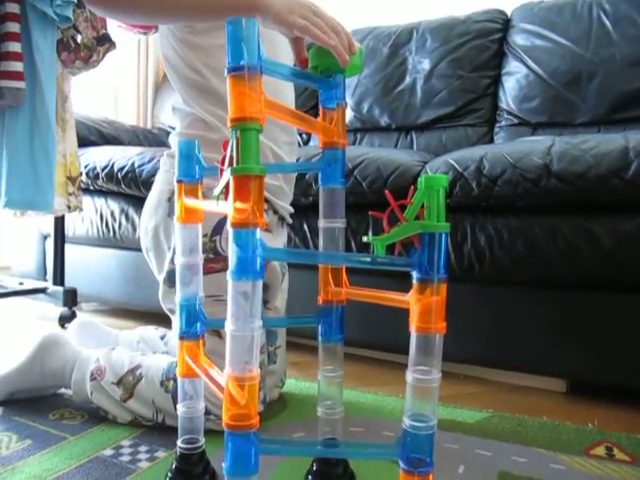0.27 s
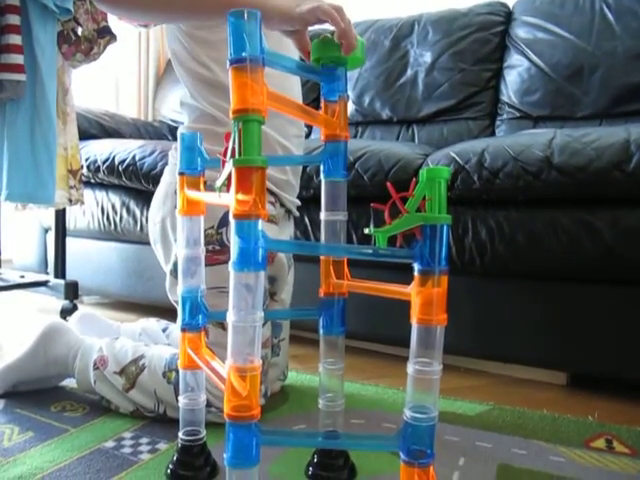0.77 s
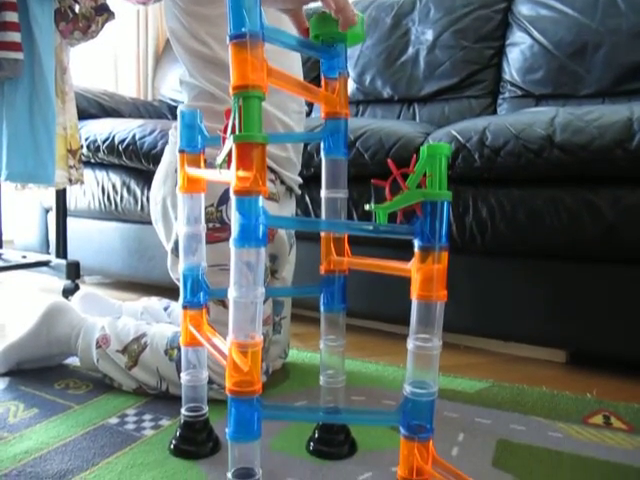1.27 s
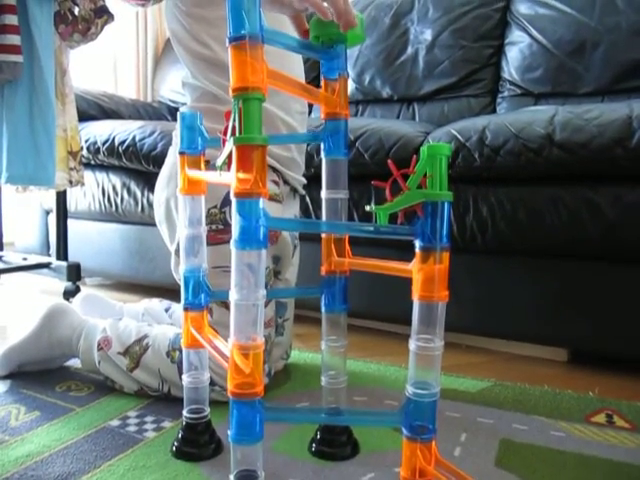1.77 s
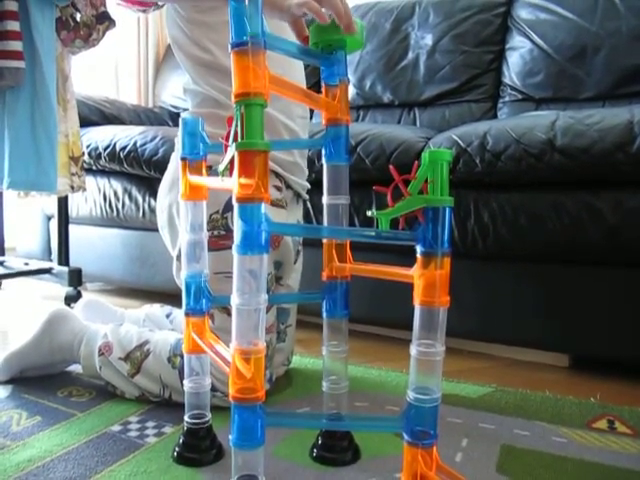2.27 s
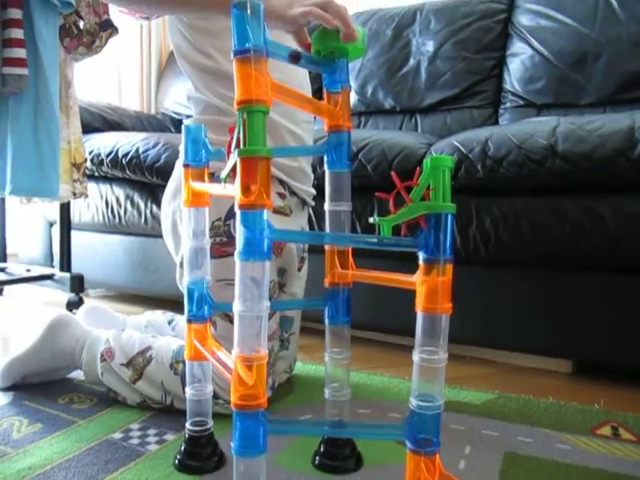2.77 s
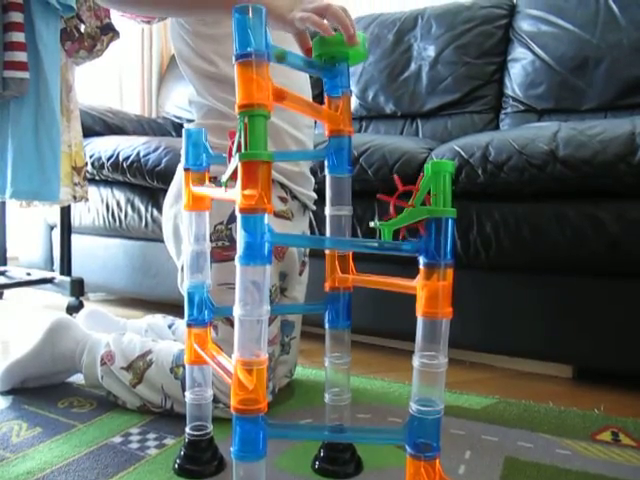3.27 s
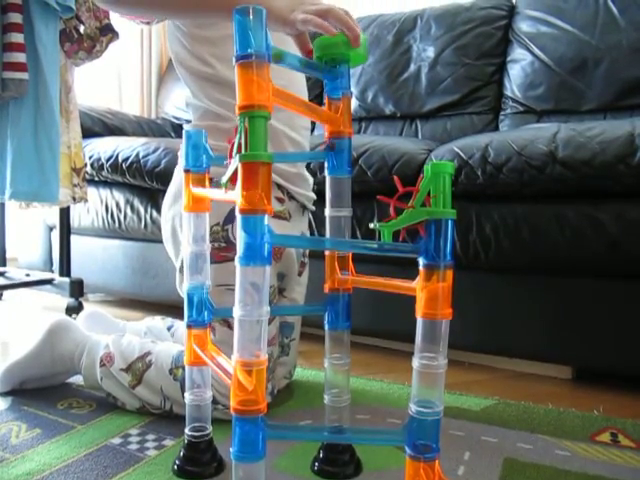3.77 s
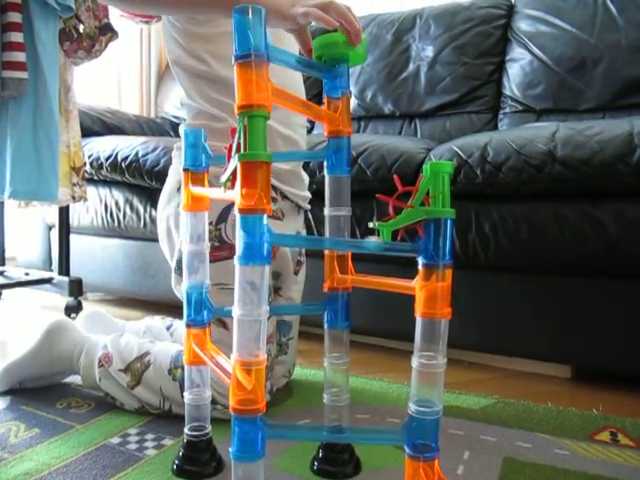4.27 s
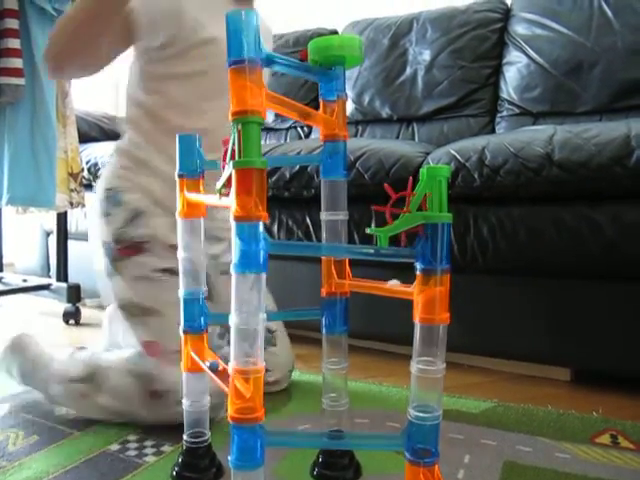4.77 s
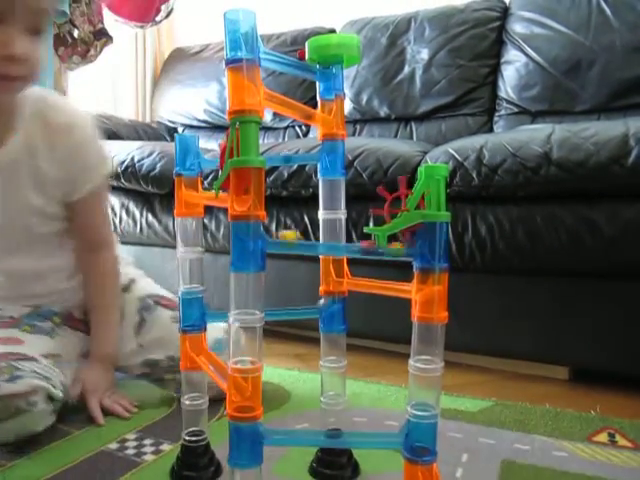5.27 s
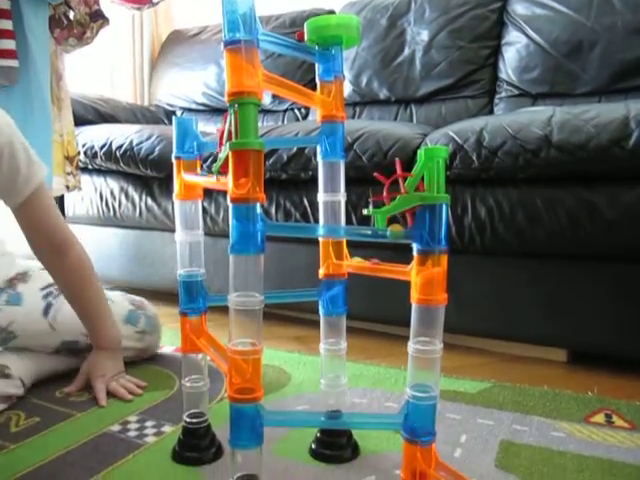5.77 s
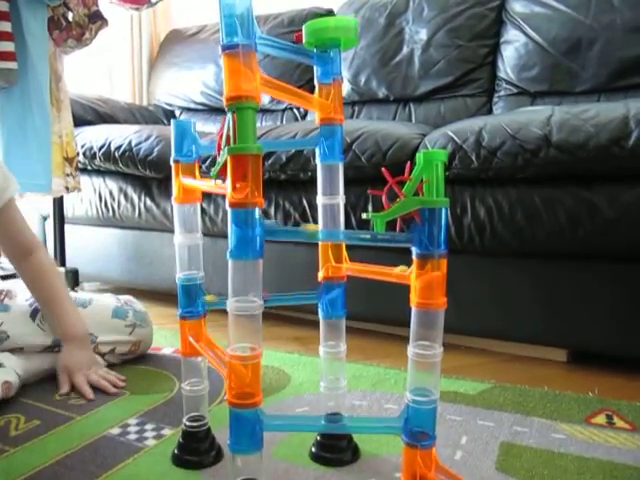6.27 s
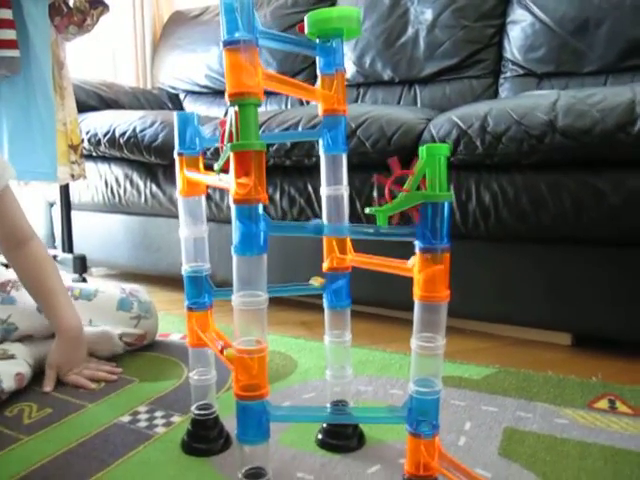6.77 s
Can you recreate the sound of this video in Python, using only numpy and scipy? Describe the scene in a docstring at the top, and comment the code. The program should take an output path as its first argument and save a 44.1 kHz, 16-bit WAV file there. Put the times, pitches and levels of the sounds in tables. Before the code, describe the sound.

For the first 0.65 seconds there is only soft room noise, hiss and a barely audible high whine. A glass marble then taps lightly on plastic at about 0.7 s, followed by a louder, crisp cluster from 1.2 to 1.4 s. Further bursts come around 1.65-1.9 s and 2.3-2.4 s, with lulls of faint ticking between them. From 2.8 s the clusters are stronger and closer, near 3.0, 3.4 and 3.7-4.0 s, with a brief easing just after 4. From about 4.3 s several marbles run together: hard, irregular clicks overlap a swelling, grainy rolling rattle, loudest from about 5 s and continuing to the cut at about 7 s. Each knock is short and bright with a tiny hollow plastic ring; occasional rim hits ping piercingly. The close microphone slightly overloads on the hardest knocks, and a living room adds short echoes.

```python
"""Glass marbles are dropped one after another into a plastic marble run in a living room.
Each knock is a short tick, a brief note of the struck wall and the ring of the piece of track.
Rolling is a stream of random small bumps that grows as more marbles run; stiff rims ping very high.
The room answers with fading echoes. A near camera adds filtered noise as hiss and a faint steady whine."""
import sys
import numpy as np
from scipy import signal
from scipy.io import wavfile

SR = 44100
rng = np.random.default_rng(int(sys.argv[2]) if len(sys.argv) > 2 else 0)


def waveform_to_disk(signal):
    """Save audio, clipped to [-1, 1], as 16-bit WAV at the path in sys.argv[1]."""
    frames = np.transpose(np.atleast_2d(signal))
    scaled = np.clip(frames, -1, 1) * 32767
    samples = np.round(scaled).astype(np.int16)
    wavfile.write(sys.argv[1], SR, samples)


N = 310023  # length of the scene [samples]

# clear knocks of a marble on plastic: (time [s], level before the parts' own levels [dB], wall pitch [Hz])
KNOCK_LIST = [(0.6734, -53, 3180), (0.7365, -20, 3000), (0.797, -26, 2440), (0.8598, -26.5, 2170),
              (1.1155, -30, 1940), (1.1702, -31, 2750.0), (1.1992, -14.5, 2250), (1.2173, -11.5, 3250),
              (1.2707, -22, 2470.0), (1.3122, -12.5, 3500), (1.375, -16.5, 2390), (1.4236, -38, 2150),
              (1.636, -12.5, 2620), (1.709, -19, 3700), (1.7662, -10.5, 2330), (1.7868, -10.5, 3200),
              (1.8174, -15.5, 3160), (1.8526, -15.5, 3110.0), (1.9184, -19, 2380), (2.0932, -38, 2810.0),
              (2.119, -35, 2290.0), (2.2605, -27.5, 2560), (2.2731, -9.5, 3930), (2.3068, -12.5, 2460),
              (2.3282, -10, 2840.0), (2.3408, -8.5, 3750), (2.3859, -10.5, 3310.0), (2.5038, -22, 2590),
              (2.5289, -26, 2600), (2.5959, -28.5, 2180), (2.69, -30.5, 2880), (2.8122, -12, 3440),
              (2.8732, -16.5, 2460), (2.888, -14, 3640), (2.924, -9.5, 3720), (2.975, -12, 3200),
              (2.9982, -13.5, 3550.0), (3.0152, -7, 3140), (3.082, -17.0, 2830), (3.1432, -15.5, 2700),
              (3.3478, -11.0, 3560), (3.3577, -8, 3600), (3.4114, -18, 2310.0), (3.4313, -9, 3140),
              (3.4544, -12, 3900), (3.4887, -19, 2370), (3.5213, -22, 2500), (3.636, -30, 2210.0),
              (3.677, -17, 2500), (3.697, -8.5, 3740), (3.7315, -14.5, 3450), (3.8048, -14.5, 3080.0),
              (3.8258, -10.5, 3330), (3.8438, -11, 4000), (3.8578, -11, 2540), (3.88, -8.5, 3700),
              (3.9092, -9, 2880), (3.9545, -17, 2170), (3.977, -21, 2290.0), (4.2587, -19.5, 2960),
              (4.2792, -11, 3800), (4.2922, -14.0, 3360), (4.3061, -8, 3150), (4.3393, -11, 2480.0),
              (4.39, -12, 2670), (4.4112, -5.5, 3950), (4.478, -14.5, 3500), (4.5744, -7.5, 3500),
              (4.7653, -26.5, 3400), (4.7869, -10.5, 2910.0), (4.829, -11, 3680), (4.8403, -12, 3940),
              (4.8755, -12, 2340), (4.8976, -9, 3030), (4.9729, -14, 4360.0), (5.003, -5.5, 3820),
              (5.034, -18.5, 2330), (5.1184, -6.5, 3850), (5.1682, -13.5, 3930.0), (5.4178, -6.5, 3480.0),
              (5.4527, -11, 3870), (5.4874, -7.5, 3430), (5.548, -21, 3360), (5.6439, -19, 2530),
              (5.6607, -12.5, 3800), (5.7257, -14, 2320.0), (5.7657, -11.5, 4000), (5.784, -7, 4180),
              (5.8047, -13, 2920), (5.8314, -16, 3970.0), (5.851, -13.5, 3550), (5.8973, -14.5, 2790.0),
              (5.927, -10.5, 3700), (6.0079, -18.0, 2440), (6.0274, -9.5, 3550), (6.0619, -14, 4270.0),
              (6.0904, -7, 3390), (6.131, -12.5, 2190.0), (6.1872, -15, 4080), (6.2536, -19.5, 2320),
              (6.3006, -29, 2280), (6.316, -9.5, 3840), (6.3793, -9, 3310.0), (6.422, -18, 2810.0),
              (6.4463, -11, 2940), (6.461, -12.0, 2570), (6.4938, -11, 3270), (6.611, -7.5, 3470),
              (6.666, -18, 3400), (6.7031, -9.5, 3800), (6.7561, -8.5, 3470), (6.7704, -11, 3780),
              (6.8349, -13.5, 3860.0), (6.9261, -15.5, 2400), (6.9473, -10.5, 3710), (7.002, -11, 3830)]
# colour of a glass-on-plastic contact: (frequency [Hz], level [dB])
CONTACT_COLOUR = [(300, -39.5), (1100, -7.5), (2400, -8), (4200, 7.5), (5300, 2), (7000, 0), (8300, 5),
                  (10400, 0)]


def amp(db):
    """Turns decibels into a gain."""
    return 10 ** (np.asarray(db) / 20)


def unit(x):
    """Scales a short sound to the energy of one millisecond at full level."""
    return x / np.sqrt(np.sum(x ** 2) * 1000 / SR + 1e-20)


def read(points, hz):
    """Reads a table between its points, on a log-frequency axis."""
    f, value = np.transpose(points)
    return np.interp(np.log(hz + 1), np.log(f), value)


def add(mix, s, sound):
    """Mixes a sound in at time s (seconds)."""
    part = mix[max(round(s * SR), 0):][:len(sound)]
    part += sound[:len(part)]


def colour(x, points, size=2048):
    """Filters a sound to the given spectrum, without any sound ahead of its cause."""
    log_gain = np.log(amp(read(points, abs(np.fft.fftfreq(size, 1 / SR)))))
    # the Hilbert transform finds the phase that puts the response as early as possible
    spectrum = np.exp(np.conj(signal.hilbert(log_gain)))
    taps = np.fft.ifft(spectrum).real
    return signal.fftconvolve(x, taps[:size // 2])[:len(x)]


def background(hush_db=-54, whine_hz=5879, whine_db=-69):
    """Steady noise coloured as low room noise and hiss, and the camera's thin whine, a pure tone."""
    # quiet of the room: (frequency [Hz], level [dB])
    hush_colour = [(20, -3), (260, 5), (800, 1), (2000, -10), (5000, -21.5), (10500, -24.5), (13000, -10.5)]
    hush = colour(rng.standard_normal(N), hush_colour)
    whine = np.sqrt(2) * np.sin(2 * np.pi * whine_hz * np.arange(N) / SR)
    return amp(hush_db) * hush / hush.std() + amp(whine_db) * whine


def blows():
    """Every knock and the weaker rebound as the marble comes down once more: (s, level dB, pitch Hz)."""
    soonest_latest_s = (0.008, 0.03)
    least_loss_db, mean_further_loss_db = 9.5, 8
    landing_hz = (2180, 3880)  # range of wall pitches that it lands on
    s, db, _ = np.transpose(KNOCK_LIST)
    wait, loss, spot = rng.random((len(KNOCK_LIST), 3)).T
    rebound_s = s + np.interp(wait, [0, 1], soonest_latest_s)
    rebound_db = db - least_loss_db + mean_further_loss_db * np.log(1 - loss)
    rebound_hz = np.interp(spot, [0, 1], landing_hz)
    return np.vstack([KNOCK_LIST, np.transpose([rebound_s, rebound_db, rebound_hz])])


def wall(t, hz, decay, rise):
    """The struck spot of thin plastic swings for a few cycles; decay and rise in seconds."""
    swing = np.sin(2 * np.pi * hz * t)
    return unit(swing * (1 - np.exp(-t / rise)) * np.exp(-t / decay))


def tick(t, decay):
    """The hard contact of glass on plastic: a short bright burst of noise."""
    return unit(colour(rng.standard_normal(len(t)) * np.exp(-t / decay), CONTACT_COLOUR))


def ring(t, detune=0.041):
    """One piece of track: each piece is tuned a little apart, each spot weights the modes anew."""
    # ring of tubes and chutes: (pitch before detuning [Hz], level [dB], time to fade by 60 dB [s])
    track_modes = [(680, -18, 0.063), (840.4, -17, 0.055), (1261, -6, 0.017), (1585, -4.5, 0.018),
                   (2026.6, 1, 0.049), (2220, 7, 0.019), (2523, -10.5, 0.1)]
    hz, db, t60 = np.transpose(track_modes)[:, :, None]
    shift, a, b = rng.standard_normal((3, len(track_modes), 1))
    turn = 2 * np.pi * hz * (1 + detune * shift) * t
    modes = amp(db - 60 * t / t60) * (a * np.sin(turn) + b * np.cos(turn))
    return unit(modes.sum(0) * (1 - np.exp(-t / 0.00094)))


def chatter(x, t, share, decay=0.0041, per_s=1600):
    """Quick re-contacts and tube echoes take a share of a blow's energy and spread it out."""
    touched = (rng.random(len(t)) < per_s / SR) * (t > .001)
    touches = rng.standard_normal(len(t)) * touched * np.exp(-t / decay)
    touches *= np.sqrt(share) / (np.linalg.norm(touches) + 1e-9)
    return unit(x + signal.fftconvolve(x, touches)[:len(x)])


def knocks(wall_db=-2, ring_db=-13, ring_growth_db=5, ring_slope_db=-9, ping_db=-6, clack_db=-7,
           aside_db=-6, spray_db=-9, size=4096):
    """Each knock is a tick, the wall's note and the ring of the piece.
    Returns what reaches the microphone directly and the broader clack thrown into the room."""
    # a firm knock on a typical spot, which every blow is compared with
    firm_db, typical_hz = -12, 3210
    # the contact tick grows more slowly than the blow and is louder on stiff, high spots
    tick_db, tick_db_per_db, tick_db_per_octave = -16.5, 0.62, 5
    # blows below this level are more and more glancing
    glancing_from_db, glancing_range_db = -9, 3.5
    t, direct, thrown = np.arange(size) / SR, np.zeros(N), np.zeros(N)
    click = unit(colour(signal.unit_impulse(size), CONTACT_COLOUR))
    for s, db, hz in blows():
        octaves = np.log2(hz / typical_hz)
        contact_db = tick_db + tick_db_per_db * (db - firm_db) + tick_db_per_octave * octaves
        # soft, glancing blows chatter and ring more
        glancing = np.clip((glancing_from_db - db) / glancing_range_db, 0, 1)
        share = 0.051 + 0.79 * glancing

        note_decay = 0.00037 * max(3200 / hz, 1) ** 2.15  # slack, low spots swing longer
        # a second mode widens the note
        neighbour = amp(clack_db) * wall(t, hz * rng.uniform(0.683, 1.193), decay=0.0016, rise=0.0025)
        both_modes = wall(t, hz, decay=note_decay, rise=0.0021) + neighbour
        note = amp(db + wall_db) * chatter(both_modes, t, share)

        # later on, rims further down ping lower
        rim_hz = np.interp(s, [1, 6], [10000, 8400]) * (1 + 0.13 * rng.standard_normal())
        ping = amp(ping_db) * wall(t, rim_hz, decay=0.0001, rise=0.0001)
        touch = tick(t, decay=0.0014 + 0.0009 * glancing)
        contact = amp(contact_db) * chatter(touch + ping, t, share)

        piece = amp(db + ring_db + ring_growth_db * glancing + ring_slope_db * octaves) * ring(t)
        add(direct, s, note + contact + piece)
        # other directions hear other patches of the wall, so the note blurs into a wide band
        spray = np.hypot(amp(db + spray_db), 0.53 * amp(contact_db)) * click
        add(thrown, s, amp(aside_db) * (note + piece) + spray)
    return direct, thrown


def effort(count=16):
    """How hard the marbles run (dB): each release adds rolling, each knock sets off brief jostling."""
    # when one more marble starts to roll: time [s]
    release_times = [0.75, 1.64, 2.27, 2.81, 3.35, 3.68, 4.26]
    marble_db, speed_up_s = -50, 0.13  # one marble before the long chutes, and its time to get going
    crowding = 0.58  # rolling power grows as this power of the number of marbles
    # the pack starts to reach the louder, long lower chutes; time from its first marble to its last
    long_chutes_s, long_chutes_db, pack_s = 4.04, 9, 0.98
    jostle_db, jostle_s = -27.5, 0.03  # level against the knock, time to its peak
    wander_db, wander_per_s = 3.5, (3, 14)  # RMS depth, range of rates
    t = np.arange(N) / SR
    marbles = sum(np.clip((t - s) / speed_up_s, 0, 1) for s in release_times)
    on_long_chutes = np.clip((t - long_chutes_s) / pack_s, 0, 1)
    power = marbles ** crowding * amp(marble_db + long_chutes_db * on_long_chutes) ** 2
    age = t[:SR] / jostle_s
    for s, db, _ in KNOCK_LIST:
        add(power, s, amp(db + jostle_db) ** 2 * age * np.exp(1 - age))
    # the rolling swells and sinks at bends and joints
    rates = np.geomspace(*wander_per_s, count)
    wander = sum(np.sin(2 * np.pi * (rate * t + rng.random())) for rate in rates)
    return 10 * np.log10(power + 1e-12) + wander_db * wander * np.sqrt(2 / count)


def rolling(effort_db, per_s, spread_db, level_db, ring_db, bright_db, bright_growth, count=28, size=2048):
    """Marbles bump over the plastic at random; bright_growth makes bumps brighter in harder runs."""
    hard_run_db = -28.5  # effort at which bright_db holds
    t, out = np.arange(size) / SR, np.zeros(N)
    bright = amp(bright_db + bright_growth * (effort_db - hard_run_db))
    for _ in range(count):
        bumps = (rng.random(N) < per_s / count / SR) * amp(spread_db * (2 * rng.random(N) - 1.5))
        bumps *= np.sign(rng.standard_normal(N)) * amp(effort_db + level_db)
        contact = wall(t, rng.uniform(2330, 4570), decay=0.00051, rise=0.00042) + tick(t, decay=0.0014)
        out += signal.oaconvolve(bumps, amp(ring_db) * ring(t))[:N]
        out += signal.oaconvolve(bumps * bright, contact)[:N]
    return out


def room(x, wet_db=-0.5, gap=.0105, early_db=-15, count=7, size=20000):
    """The walls answer, weakly before the gap (s); the echo pattern shifts as the marbles move."""
    # decay of the room: (frequency [Hz], time to fade by 60 dB [s])
    room_decay = [(600, 0.77), (3500, 0.26), (10000, 0.31)]
    t, out = np.arange(size) / SR, np.zeros(N)
    turns = rng.uniform(1, 4, (count, 1)) * np.arange(N) / SR + rng.random((count, 1))
    places = np.cos(2 * np.pi * turns)
    for place in places / np.linalg.norm(places, axis=0):
        taps = rng.standard_normal(size) * (rng.random(size) < .2)
        taps = taps * np.where(t > gap, 1, amp(early_db)) * (t > .002)
        # each frequency band fades at its own speed
        hz, times, z = signal.stft(taps, SR)
        fade = amp(-60 * times / read(room_decay, hz)[:, None])
        tail = signal.istft(z * fade, SR)[1]
        out += signal.oaconvolve(x * place, tail / np.linalg.norm(tail))[:N]
    return amp(wet_db) * out


def rim_hits(level_db=-6, snap_db=4, decay=0.00046, rise=0.0002, snap_decay=0.00061, size=1024):
    """A stiff rim struck squarely snaps and rings very high for about a millisecond."""
    # piercing pings: (time [s], level before level_db and snap_db [dB], pitch [Hz])
    square_hits = [(0.8592, -30, 9400), (1.2709, -13.5, 9300), (1.3123, -16, 10100), (1.374, -14, 9800),
                   (1.9173, -16.5, 9360), (2.3847, -13, 10200), (2.8122, -18, 10600), (3.3472, -17, 10000),
                   (3.8251, -13, 10400), (6.4208, -13.5, 8500)]
    t, out = np.arange(size) / SR, np.zeros(N)
    for s, db, hz in square_hits:
        # differencing noise twice leaves mostly treble
        snap = unit(np.diff(rng.standard_normal(size + 2), 2) * np.exp(-t / snap_decay))
        add(out, s, amp(db + level_db) * (wall(t, hz, decay, rise) + amp(snap_db) * snap))
    return out


def scene(rim_room_db=-8, seam_db=-52):
    """Knocks, rim pings, small rattles, faint seam ticks and the rumble of rolling, in the room."""
    unevenness_db = 9  # bump levels spread over twice this range
    effort_db = effort()
    rattle = rolling(effort_db, per_s=90, spread_db=unevenness_db, level_db=0.5, ring_db=-2,
                     bright_db=3, bright_growth=0.3)
    rumble = rolling(effort_db, per_s=600, spread_db=unevenness_db, level_db=-9, ring_db=-1.3,
                     bright_db=-10, bright_growth=0.38)
    # above seam_db, seams tick just as faintly however hard the run, so they show in the lulls
    seams = rolling(np.minimum(effort_db, seam_db), per_s=25, spread_db=unevenness_db, level_db=4,
                    ring_db=-4, bright_db=0, bright_growth=0.0, count=8)
    small = rattle + rumble + seams
    direct, thrown = knocks()
    rims = rim_hits()
    echoes = room(thrown + amp(rim_room_db) * rims + small)
    return (direct + rims + small + echoes + background())[None]


def record(dry, ceiling=0.85, knee=8, lean=0.055):
    """The microphone dulls the top; the hardest knocks overload it a little unevenly and so thud."""
    # treble response of the microphone: (frequency [Hz], level [dB])
    microphone_response = [(10500, 1.5), (11300, -11), (11850, -34), (12400, -14), (13300, -16.5),
                           (15800, -22.5), (16200, -56)]
    edge_hz = 16900  # nearly nothing passes above this
    x = colour(dry[0], microphone_response)
    # soft limit, a little higher on the positive side
    limit = ceiling + lean * np.sign(x)
    x = x / (1 + abs(x / limit) ** knee) ** (1 / knee)
    low_pass = signal.firwin(511, edge_hz, window=("kaiser", 9), fs=SR)
    return signal.oaconvolve(x, low_pass, "same")[None]


dry = scene()
out = record(dry)
waveform_to_disk(out)
```